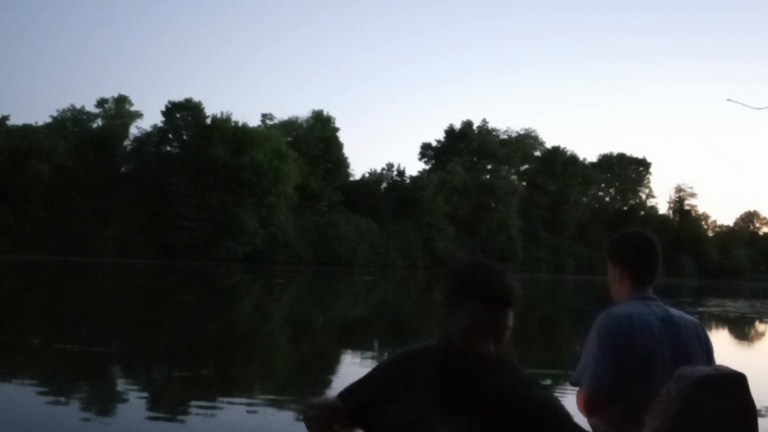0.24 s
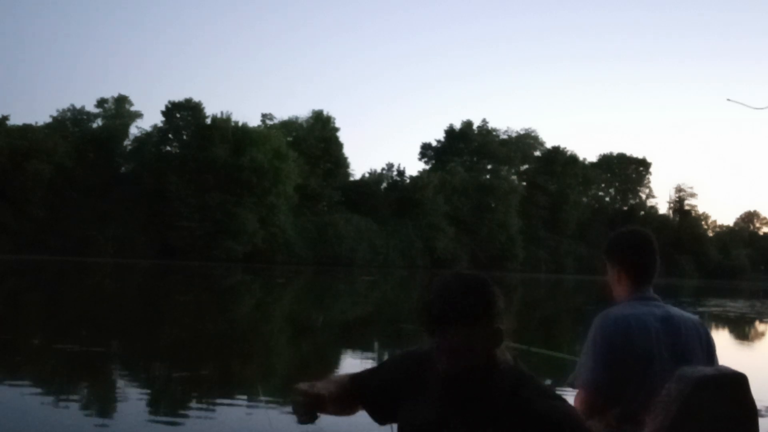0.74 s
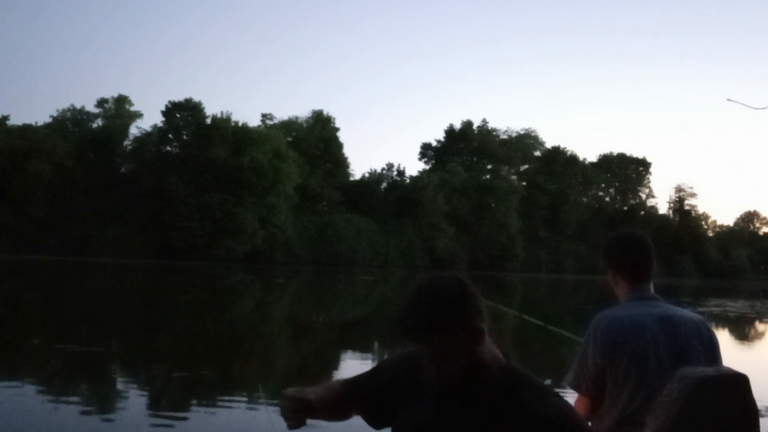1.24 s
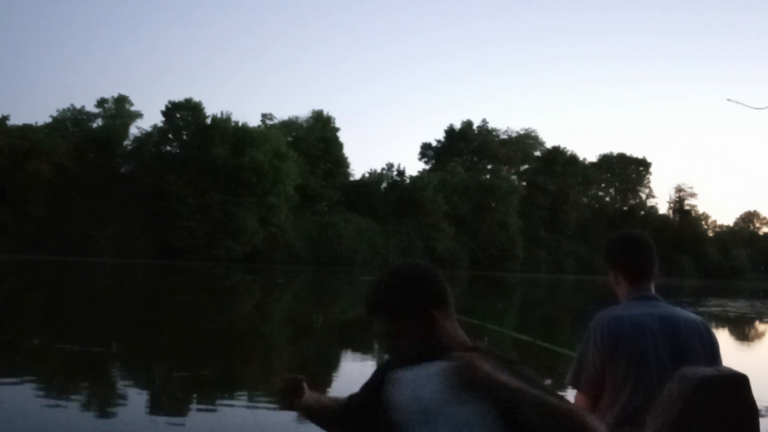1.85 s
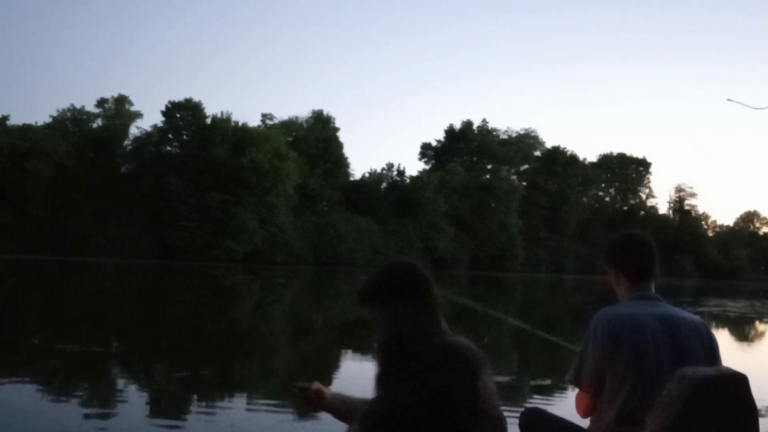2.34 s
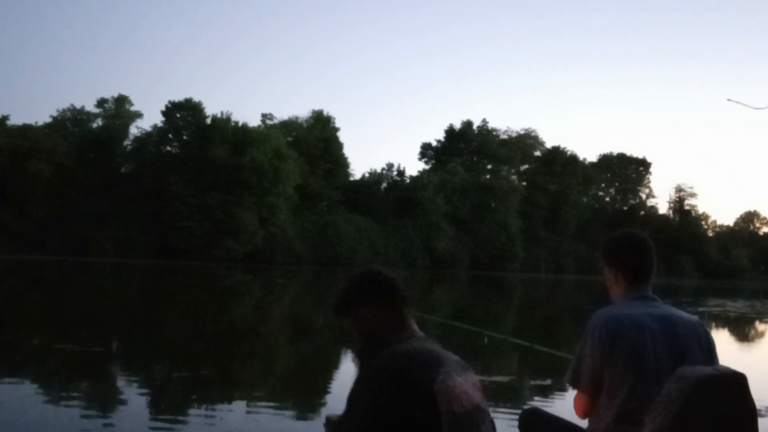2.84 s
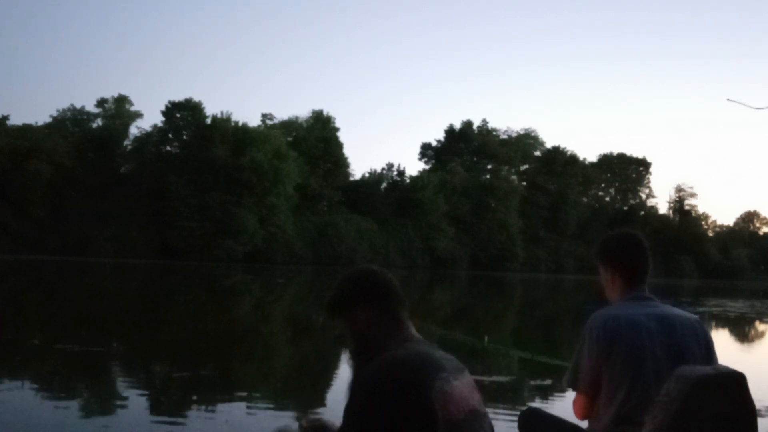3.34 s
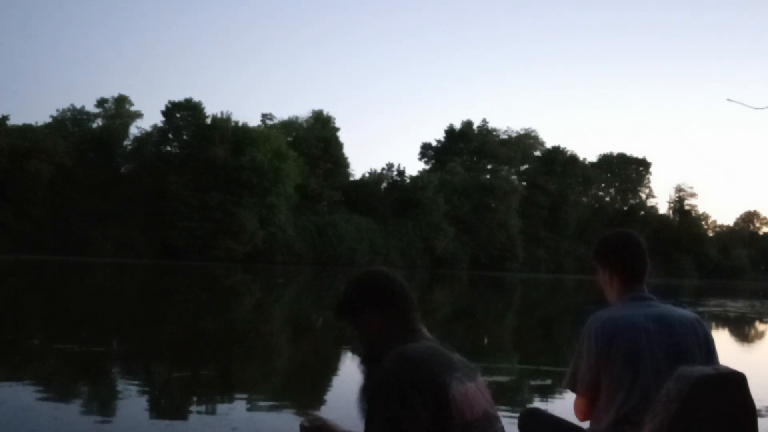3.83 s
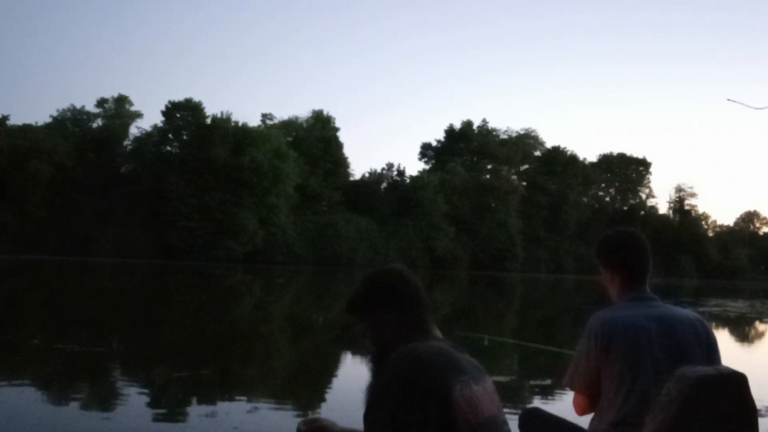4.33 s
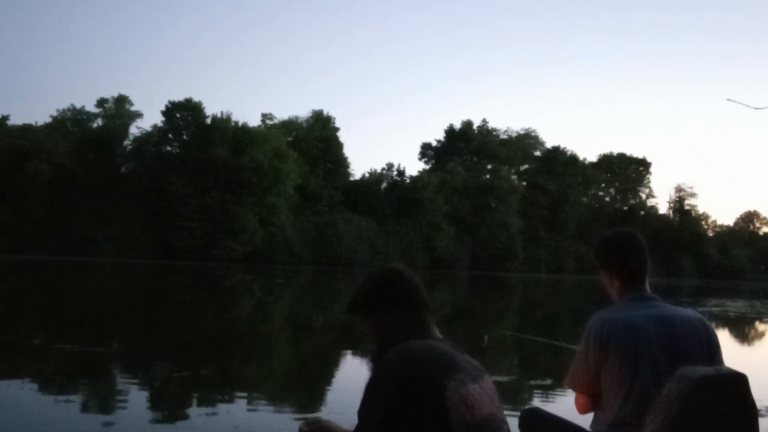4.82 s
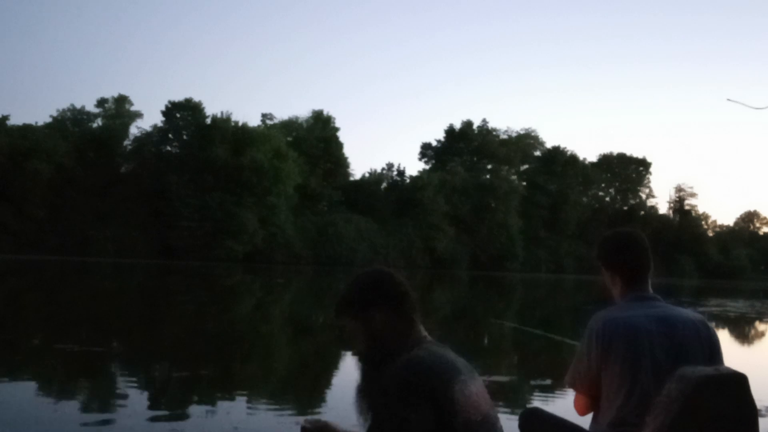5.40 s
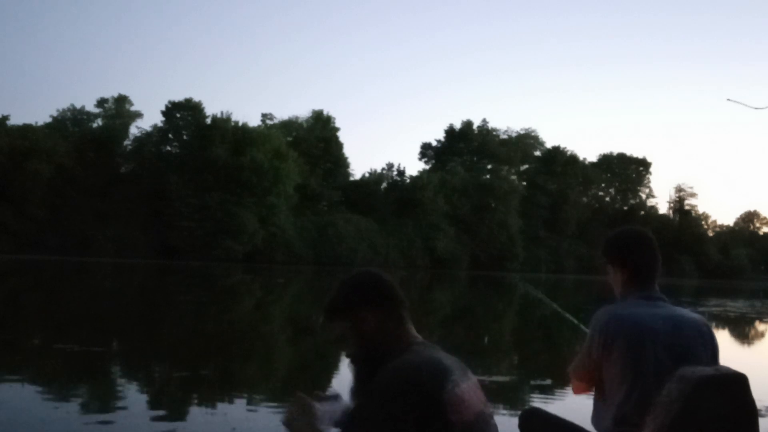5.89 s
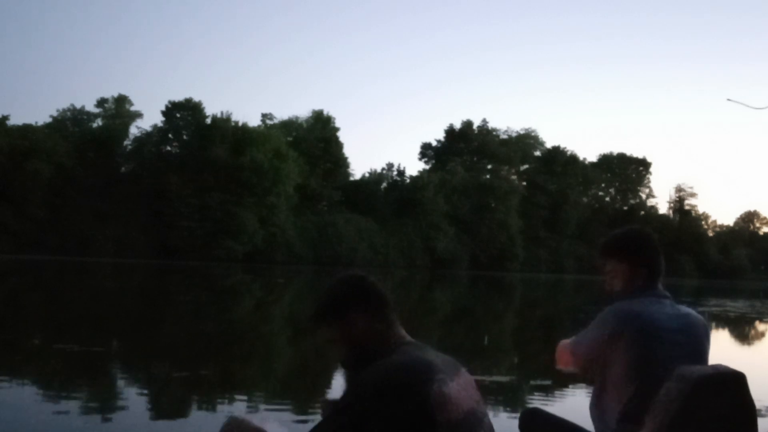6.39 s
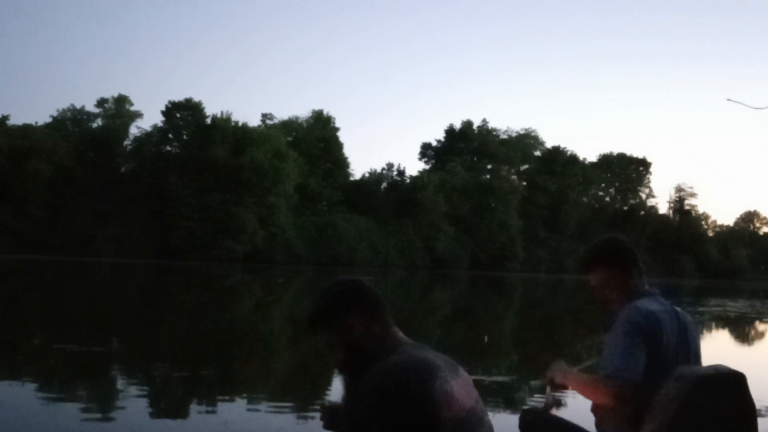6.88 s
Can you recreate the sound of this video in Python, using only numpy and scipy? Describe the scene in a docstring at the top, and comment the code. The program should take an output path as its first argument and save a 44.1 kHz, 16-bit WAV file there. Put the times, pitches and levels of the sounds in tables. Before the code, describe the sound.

Outdoors by a quiet pond at dusk, a small frog slightly left gives crisp, high grating calls about three times a second, answered by a fainter, blurred double-clicking one. Calls grow denser with extra ticks. Clothes scuff softly and a tackle box knocks, loudest about five seconds in. A faint distant engine hums early on. Stereo microphone near the anglers, light echoes from reeds and trees.

```python
"""Two small callers, probably cricket frogs, at a pond at dusk: pulse trains of decaying tones with noisy rasp.
Filtered, diffuse echoes answer from reeds, trees and banks. An angler shifts about: tackle knocks are sums
of damped modes with noise, clicks are noise bursts, clothes are flickering noise in scuffs. Now and then an
insect buzzes in narrow-band noise; a distant engine, still air and a far frog chorus are shaped noise."""
import sys
import numpy as np
from scipy import signal
from scipy.fft import rfft, irfft, next_fast_len
from scipy.io import wavfile
from scipy.ndimage import uniform_filter1d, map_coordinates

SR = 44100
rng = np.random.default_rng(int(sys.argv[2]) if len(sys.argv) > 2 else 0)


def dump(signal):
    """Clip the signal to [-1, 1] and save it as 16-bit WAV at the path in sys.argv[1]."""
    limited = np.clip(np.atleast_2d(signal).T, -1, 1)
    pcm = np.round(limited * 32767).astype(np.int16)
    wavfile.write(sys.argv[1], SR, pcm)


N = 315315  # samples


def frog(calls, click_hz, rasp_hz, spread, double_gap_s, rasp, rasp_db, swell_s, fade_db, scatter_db):
    """Each pulse of the larynx rings the vocal sac for a few cycles; longer calls are higher, and pulses tend to weaken."""
    pulse_gap_s, full_pulses = .0049, 6.2  # calls reach rasp_hz at full_pulses
    late_s, bend_spread, tightening = .00028, .016, .025
    tone, gate = np.zeros(N), np.zeros(N)
    t = np.arange(SR // 100) / SR
    shape = (t / swell_s * np.exp(1 - t / swell_s)) ** 2
    for start_s, db, pulses in calls:
        chance = rng.standard_normal((10, 3))
        count = int(np.clip(round(pulses), 1, 10))
        call_hz = np.interp(count, [1, full_pulses], [click_hz, rasp_hz])
        call_hz *= 1 + spread * rng.standard_normal()
        gap_s = double_gap_s if count == 2 else pulse_gap_s
        for k, (late, size, bend) in enumerate(chance[:count]):
            later = k > 0
            pulse_s = start_s + k * gap_s + later * late * late_s
            gain = amp(db - fade_db * k / count + later * scatter_db * size)
            # the sac tightens after the first pulse
            pulse_hz = call_hz * (1 + bend_spread * bend + tightening * later)
            add(tone, pulse_s, gain * shape * np.sin(2 * np.pi * pulse_hz * t))
            add(gate, pulse_s, gain * shape)
    band_hz, band_db = np.transpose(rasp)
    rough = gate * rng.standard_normal(N)
    grit = filtered(rough, lambda hz: amp(np.interp(hz, band_hz, band_db)))
    return tone + amp(rasp_db) * grit


def near_frog():
    """Crisp calls from the left bank, scattered by reeds and echoed by the trees."""
    # Rasps and ever more short clicks between. Each row: start in seconds, relative level in dB, pulse count.
    near_calls = [(.2504, -25, 5), (.6096, -24, 5), (.9668, -24.5, 4), (1.2985, -22.5, 4), (1.6398, -24, 5),
                  (1.9675, -23, 5), (2.2933, -25.5, 1), (2.3537, -23.5, 4), (2.7178, -22, 5),
                  (3.101, -23.5, 5), (3.4053, -21.5, 6), (3.6971, -25.5, 1), (3.7535, -23.5, 5),
                  (3.9645, -27.5, 1), (4.0034, -23.5, 3), (4.1755, -29, 1), (4.2738, -22, 6),
                  (4.6285, -27.5, 1), (4.7178, -24.5, 8), (4.9548, -25.5, 2), (5.0001, -24, 3),
                  (5.1343, -32.5, 1), (5.1688, -23.5, 4), (5.2965, -27, 1), (5.3324, -25.5, 3),
                  (5.4676, -25, 2), (5.517, -25.5, 4), (5.6811, -26, 2), (5.727, -23.5, 1),
                  (5.8684, -25.5, 2), (5.9749, -23.5, 6), (6.2722, -25.5, 1), (6.3132, -24.5, 1),
                  (6.3875, -23, 9), (6.7227, -28.5, 2), (6.7746, -25.5, 4), (7.0046, -23.5, 1),
                  (7.0709, -22.5, 8)]
    # Rasp filter. Each row: frequency in Hz, gain in dB.
    near_rasp = [(1100, -26.5), (1650, -10.5), (2650, 1.5), (3050, 9), (4000, -20), (4450, -1.5),
                 (5200, -2), (5900, -16.5), (6800, -16.5), (8100, -48), (10500, -35.5), (13000, -38.5),
                 (15000, -22)]
    voice = frog(near_calls, click_hz=3295, rasp_hz=3400, spread=0.006, double_gap_s=.009,
                 rasp=near_rasp, rasp_db=-5.5, swell_s=0.001, fade_db=8.5, scatter_db=3.2)
    bank_ring = ringing(voice)
    direct = bounce(voice, delay_s=.003365, gain=.25) + amp(-19.5) * bank_ring
    reeds = amp(-6.5) * echoes(voice, t60_s=.13)
    trees = amp(-17.0) * echoes(voice, t60_s=.48)
    banks = amp(-9.5) * echoes(bank_ring, t60_s=0.28)
    return amp(-0.5) * (placed(direct, lead_ms=0.4752, pan_db=3.5) + reeds + trees + banks)


def far_frog():
    """A fainter caller, smeared by reflections on its way over the water."""
    # Mostly double clicks. Each row: start in seconds, relative level in dB, pulse count.
    far_calls = [(.026, -45.5, 2), (.0713, -38, 2), (.4056, -34.5, 2), (.7229, -35.5, 1), (.7732, -34, 2),
                 (1.061, -37.5, 2), (1.099, -33.5, 2), (1.3957, -35, 2), (1.438, -34.5, 2),
                 (1.706, -35.5, 2), (1.9286, -34, 2), (2.14, -38, 2), (2.324, -38, 2), (2.465, -47, 2),
                 (2.5163, -39, 4), (2.909, -41.5, 2), (3.0785, -39.5, 2), (3.279, -35.5, 1),
                 (3.294, -41, 2), (3.516, -36.5, 2), (3.5685, -36.5, 3), (3.8425, -34.5, 3),
                 (4.0837, -38.5, 2), (4.1256, -36.5, 2), (4.1544, -33.5, 3), (4.3834, -36, 2),
                 (4.425, -35.5, 2), (4.4778, -32.5, 4), (4.709, -33, 2), (4.756, -37.5, 3),
                 (4.9405, -40, 2), (5.1305, -31.5, 1), (5.3987, -37, 2), (5.444, -36.5, 2), (5.509, -31, 2),
                 (5.71, -35.5, 2), (5.7945, -37, 2), (5.8368, -33, 5), (6.067, -37, 2), (6.1025, -39, 2),
                 (6.137, -39.5, 2), (6.168, -39, 5), (6.4821, -35, 2), (6.518, -36, 6), (6.75, -38.5, 2),
                 (6.8514, -37, 1), (6.878, -34, 2), (6.913, -33, 5)]
    # Rasp filter. Each row: frequency in Hz, gain in dB.
    far_rasp = [(1700, -35), (2300, -11.5), (2800, 7.5), (3900, -13), (4250, -4), (4600, -5.5), (5300, 1.5),
                (5900, -11.5), (6800, -14.5), (8000, -42), (13000, -31.5), (15000, -21)]
    voice = frog(far_calls, click_hz=3505, rasp_hz=3562, spread=0.028, double_gap_s=0.0061,
                 rasp=far_rasp, rasp_db=-1, swell_s=0.00098, fade_db=12.5, scatter_db=6.5)
    bank_ring = ringing(voice)
    direct = bounce(voice, delay_s=.003365, gain=.5) + amp(-9.5) * bank_ring
    reeds = amp(-1) * echoes(voice, t60_s=.08)
    trees = amp(-7.5) * echoes(voice, t60_s=0.26)
    banks = amp(-2) * echoes(bank_ring, t60_s=0.15)
    return amp(-0.5) * (placed(direct, lead_ms=0.465, pan_db=1.0) + reeds + trees + banks)


def ringing(x):
    """Many late echoes from the banks add up at a few pitches, as parallel band-pass resonances."""
    # Bank resonances. Each row: frequency in Hz, width in Hz, gain in dB.
    resonances = [(2875, 30, -5), (3026, 28, -7), (3277, 32, 0), (3513, 24, -1), (3565, 24, 4),
                  (3633, 22, -4), (3780, 30, -2), (3868, 28, 0), (4400, 55, 0)]

    def response(f):
        return sum(amp(db) * 1j * f * width / (hz ** 2 - f ** 2 + 1j * f * width)
                   for hz, width, db in resonances)
    return filtered(x, response)


def knocks():
    """Each blow rings the box at new strengths over a dull thud; hard contacts favour high modes and add clatter."""
    # Tackle set down on the bank. Each row: start in seconds, relative level in dB, hardness in dB.
    blows = [(1.215, -53, -21), (1.273, -48.5, -31), (1.322, -50, -45), (1.554, -46, -28), (2.399, -45, -6),
             (2.637, -41, -13), (2.647, -38.5, -25), (2.705, -43, -16), (2.775, -45.5, -17),
             (2.801, -47, -13), (2.931, -44, -30), (3.162, -41, -18.5), (3.339, -51.5, -3.5),
             (4.023, -30, -5.5), (4.032, -35.5, -31), (5.067, -26.5, -8), (5.093, -23.5, -20),
             (5.1, -37.5, -42), (5.109, -46, -2.5), (5.302, -48, -15.5), (5.615, -36, -21.5),
             (6.814, -44.5, -1.5), (7.039, -36.5, -6), (7.051, -38, -7)]
    # Modes of the tackle box. Each row: frequency in Hz, relative level in dB, 60 dB decay time in seconds.
    box_modes = [(379.2, -1.5, 0.12), (496.5, 2, 0.039), (575, -8, 0.12), (624, 15, 0.042),
                 (720, -22, 0.025), (770, 9.5, 0.027), (1070, -5, 0.025), (1220, -29, 0.046),
                 (1507, -16.5, 0.073), (2430, -23, 0.036), (2430, -19, 0.038)]
    # Noise spectra. Each row: frequency in Hz, relative density in dB.
    thud_spectrum = [(130, -20), (210, -7), (400, -2), (620, 3.5), (820, -3), (1100, -12.5), (2000, -46.5)]
    clatter_spectrum = [(300, -44), (600, 0), (1000, -11), (1400, 7.5), (2000, -2), (2700, 6), (3500, -34),
                        (6500, -13.5), (8000, -32), (15000, -43)]
    mode_scatter_db, bend_spread, phase_spread_rad = 8.1, 0.0031, 1.36
    rise_s, thud_t60_s, clatter_t60_s = 0.0019, 0.081, 0.048
    ring, thud, clatter = np.zeros(N), np.zeros(N), np.zeros(N)
    t = np.arange(SR // 5) / SR
    rise = 1 - np.exp(-(t / rise_s) ** 2)
    hz, mode_db, t60_s = np.transpose(box_modes)[:, :, None]
    for start_s, db, hard_db in blows:
        size, bend, turn = rng.standard_normal((3, len(box_modes), 1))
        tilt_db = .5 * (hard_db + 11) * np.log2(hz / 600)
        decay = amp(mode_db + tilt_db + mode_scatter_db * size - 60 * t / t60_s)
        modes = decay * np.sin(2 * np.pi * hz * (1 + bend_spread * bend) * t + phase_spread_rad * turn)
        blow = modes.sum(0) * rise
        thud_db = db - .5 * max(hard_db + 6.0, 0)  # hard blows thud less
        add(ring, start_s, amp(db) * blow / abs(blow).max())
        add(thud, start_s, amp(thud_db - 60 * t / thud_t60_s) * rise)
        add(clatter, start_s, amp(db + hard_db - 60 * t / clatter_t60_s) * rise)
    mix = amp(-4.5) * ring
    mix += amp(-9.0) * thud * noise(thud_spectrum)
    mix += amp(1.5) * clatter * noise(clatter_spectrum)
    # keep the knocks free of deep bass
    high_pass = signal.butter(4, 165, "high", fs=SR, output="sos")
    mix = signal.sosfilt(high_pass, mix)
    return placed(mix, lead_ms=0.045, pan_db=-0.8) + amp(-10.5) * echoes(mix, t60_s=0.2)


def clicks():
    """Small hard parts of reel and lure snap: noise with a fast decay and a weaker, slower one."""
    # Each row: start in seconds, relative level in dB.
    snaps = [(0.4933, -49.5), (1.0588, -46.5), (1.6029, -45), (1.791, -44.5), (2.05, -49.5), (2.194, -51.5),
             (2.401, -48.5), (2.47, -54.5), (2.627, -53.5), (2.8045, -52), (4.0253, -41.5), (4.0577, -53.5),
             (5.0912, -40.5), (5.1076, -49.5), (6.8117, -31.5), (6.9621, -33)]
    # Each row: frequency in Hz, relative density in dB.
    click_spectrum = [(250, -56), (600, -19), (1200, -7), (2500, 0.5), (4300, 2.5), (6000, 2),
                      (8000, -12.5), (10500, -11.5), (13000, -20), (15000, -11)]
    gate = np.zeros(N)
    t = np.arange(SR // 10) / SR
    decay = amp(-60 * t / 0.027) + amp(-6.5 - 60 * t / 0.11)
    for start_s, db in snaps:
        add(gate, start_s, amp(db) * decay)
    return amp(-5) * gate * wide(click_spectrum, side_db=0.0)


def clothes():
    """Cloth rubs in scuffs that rise, hold and die away, with a flickering bright swish over them."""
    # Each row: start in seconds, time to decay in seconds, relative rubbing level in dB, relative swish level in dB.
    scuffs = [(.25, .2, -76.5, -89), (0.489, 0.018, -64, -73.5), (1.016, 0.072, -53.5, -79),
              (1.12, 0.12, -66, -102), (1.203, 0.012, -61, -92), (1.26, 0.056, -60, -97.5),
              (1.317, 0.029, -54.5, -87), (1.546, 0.015, -55, -86), (1.586, .05, -72.5, -82),
              (1.804, 0.0067, -79, -71), (1.876, 0.045, -53, -79), (1.918, 0.18, -55.5, -78.5),
              (2.101, 0.059, -63.5, -94), (2.182, 0.038, -52, -70), (2.246, 0.067, -69.5, -97),
              (2.57, 0.016, -56.5, -98), (2.622, 0.028, -50.5, -81.5), (2.698, 0.019, -59.5, -83.5),
              (2.772, 0.045, -64, -86.5), (2.904, 0.053, -56, -95.5), (3.091, 0.095, -57.5, -92.5),
              (3.315, 0.059, -62, -95.5), (3.637, 0.045, -65, -105), (7.05, 0.078, -53, -79)]
    # Noise spectra. Each row: frequency in Hz, relative density in dB.
    rub_spectrum = [(100, -15), (200, 3.5), (330, -2), (420, 1), (540, 3), (650, -2.5), (780, -6),
                    (950, -6.5), (1500, -11.5), (2500, -12.5), (5000, -18), (9000, -45.5)]
    swish_spectrum = [(1500, -13), (3000, -44.5), (6000, 21.5), (8500, 6), (10500, 11.5), (13000, -1),
                      (15500, 12.5)]
    attack_s, t60_s = 0.0084, 0.13  # cloth grips quickly, then slides to rest
    rubbing, swishing = np.zeros(N), np.zeros(N)
    t = np.arange(SR // 2) / SR
    for start_s, hold_s, rub_db, swish_db in scuffs:
        attack = np.minimum(t / attack_s, 1)
        stroke = attack * amp(-60 * np.maximum(t - hold_s, 0) / t60_s)
        add(rubbing, start_s, amp(rub_db) * stroke)
        add(swishing, start_s, amp(swish_db) * stroke)
    rub_flicker = unit(amp(2.2 * wobble(60) + 3 * wobble(250)))
    rub = rub_flicker * patchy(wide(rub_spectrum, side_db=-12), depth_db=3.5)
    swish_flicker = unit(amp(3.5 * wobble(60) + 4 * wobble(700)))
    swish = swish_flicker * patchy(wide(swish_spectrum, side_db=-2), depth_db=2)
    cloth = amp(-1.5) * rubbing * rub + amp(12.5) * swishing * swish
    return cloth + amp(-11) * echoes(cloth.mean(0), t60_s=.4)


def insect():
    """Short high buzzes: a narrow wing resonance rubbed by a file, as narrow-band noise."""
    # Each row: start in seconds, length in seconds, centre frequency in Hz, level before swell and pan in dB.
    buzzes = [(1.217, .09, 7500, -85), (1.654, 0.14, 7080, -71), (4.466, 0.13, 7180, -74.5),
              (5.216, 0.12, 7400, -85.5), (6.314, 0.069, 7350, -80)]
    out = np.zeros(N)
    for start_s, length_s, hz, db in buzzes:
        wing = noise([(hz * .8, -50), (hz * .94, -4), (hz, 0), (hz * 1.04, -4), (hz * 1.12, -50)])
        swell = signal.windows.tukey(int(length_s * SR), .5)
        add(out, start_s, amp(db) * swell * wing[:len(swell)])
    return placed(out, lead_ms=0, pan_db=6)


def engine():
    """A far engine draws nearer, then recedes: low humming noise whose level wavers on the way."""
    # Each row: time in seconds, level before waver in dB.
    approach = [(0, -69.5), (1.3, -64.5), (1.7, -62), (2.3, -63), (3.45, -64.5), (3.9, -71), (5, -76),
                (7.15, -74)]
    # Each row: frequency in Hz, relative density in dB.
    hum_spectrum = [(25, -61), (45, -17.5), (58, -2.5), (70, -6), (81, 10), (94, 1.5), (120, 0.5),
                    (170, -20), (300, -76)]
    waver_db, knots_per_s = 0.53, 9.8
    level_db = np.interp(np.arange(N) / SR, *np.transpose(approach))
    level_db += waver_db * wobble(knots_per_s)
    return amp(level_db) * wide(hum_spectrum, side_db=-20)


def air():
    """Still air: steady, mostly low noise."""
    # Each row: frequency in Hz, relative density in dB.
    air_spectrum = [(25, -9.5), (60, -24), (110, -1), (200, 0), (350, -10), (700, -8.5), (1000, -13),
                    (1800, -21.5), (5000, -29), (8000, -39.5), (15000, -34)]
    return amp(-74.5) * wide(air_spectrum, side_db=-5.5)


def chorus():
    """Many frogs across the pond blur into wide noise of gently varying level and patchy tone."""
    # Each row: frequency in Hz, relative density in dB.
    chorus_spectrum = [(1800, -28), (2900, -14.5), (3550, 5), (3850, -12), (4200, -15.5), (5500, -31),
                       (8000, -40)]
    blur = patchy(wide(chorus_spectrum, side_db=3), depth_db=4)
    return amp(-70.5 + 0.9 * wobble(12)) * blur


def amp(db):
    """Decibels to gain."""
    return 10 ** (np.asarray(db) / 20)


def unit(x):
    """x at rms 1."""
    return x / np.sqrt(np.mean(x ** 2) + 1e-20)


def wobble(knots_per_s):
    """A smooth random curve through normally distributed knots."""
    knots = rng.standard_normal(int(N * knots_per_s / SR) + 4)
    return map_coordinates(knots, [np.arange(N) * knots_per_s / SR])


def filtered(x, response):
    """x times a complex response of frequency, zero-padded."""
    m = next_fast_len(x.shape[-1] + SR // 4)
    spectrum = rfft(x, m) * response(np.fft.rfftfreq(m, 1 / SR))
    return irfft(spectrum, m)[..., :x.shape[-1]]


def noise(spectrum):
    """Noise of rms 1 with a (Hz, dB) spectrum, interpolated over log frequency."""
    f, db = np.transpose(spectrum)
    white = rng.standard_normal(N)
    return unit(filtered(white, lambda hz: amp(np.interp(np.log(hz + 1), np.log(f), db))))


def wide(spectrum, side_db):
    """Stereo noise of rms 1: a shared part and a part of opposite sign at the two ears."""
    mid = noise(spectrum)
    side = amp(side_db) * noise(spectrum)
    return unit(np.array([mid + side, mid - side]))


def patchy(x, depth_db):
    """Brief random resonances come and go in a stereo noise."""
    z = signal.stft(x, nperseg=1024)[2]
    field = rng.standard_normal(z.shape[1:])
    field = uniform_filter1d(field, size=4, axis=0)
    field = uniform_filter1d(field, size=4, axis=1)
    shaped = z * amp(depth_db * unit(field))
    return unit(signal.istft(shaped, nperseg=1024)[1][:, :N])


def add(track, start_s, sound):
    """Mix a sound into a track."""
    i = max(round(start_s * SR), 0)
    part = track[i:i + len(sound)]
    part += sound[:len(part)]


def placed(x, lead_ms, pan_db):
    """Stereo from mono: positive lead_ms and pan_db make the left ear earlier and louder."""
    ears = np.array([[1], [-1]]) / 2
    return filtered(x, lambda hz: amp(ears * pan_db) * np.exp(2j * np.pi * hz * ears * lead_ms / 1000))


def bounce(x, delay_s, gain):
    """x with one close reflection."""
    return filtered(x, lambda hz: 1 + gain * np.exp(-2j * np.pi * hz * delay_s))


def echoes(x, t60_s):
    """Diffuse echoes of about x's power, different at each ear, crossfading to a new random tail three times a second."""
    t = np.arange(SR // 2) / SR
    hop = SR // 3
    fade = np.sqrt(signal.windows.hann(2 * hop))
    decay = amp(-60 * t / t60_s) * (t > .002)
    padded = np.pad(x, (hop, 2 * hop))
    wet = np.zeros((2, N + 2 * SR))
    for i in range(0, N + hop, hop):
        tail = rng.standard_normal((2, len(t))) * decay / np.linalg.norm(decay)
        part = signal.fftconvolve((fade * padded[i:i + 2 * hop])[None], tail, axes=1)
        wet[:, i:i + part.shape[1]] += part
    return wet[:, hop:hop + N]


def scene():
    """Everything that sounds at the pond."""
    frogs = near_frog() + far_frog()
    angler = knocks() + clicks() + clothes()
    background = engine() + air() + chorus()
    return frogs + angler + insect() + background


def record(dry):
    """Cuts everything from the band limit up."""
    top_hz = 15800
    return filtered(dry, lambda hz: hz < top_hz)


dry = scene()
out = record(dry)
dump(out)
```